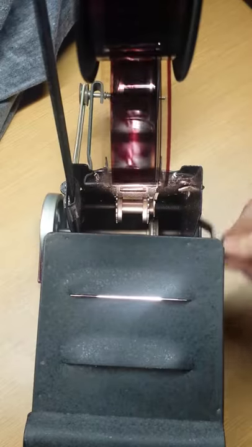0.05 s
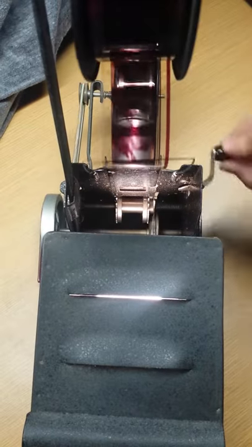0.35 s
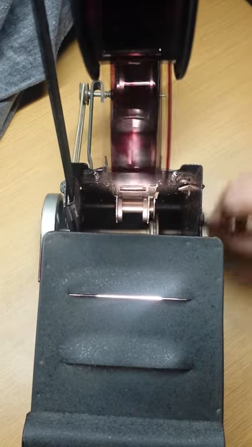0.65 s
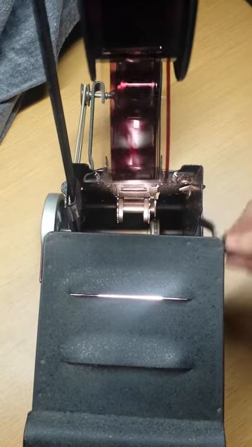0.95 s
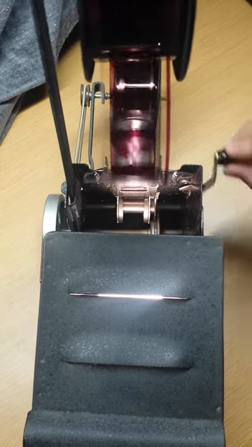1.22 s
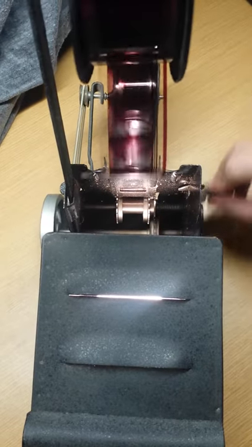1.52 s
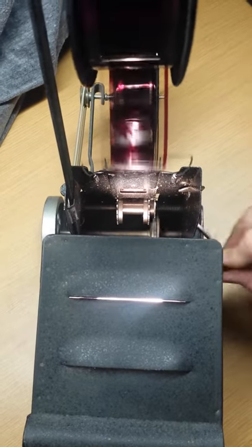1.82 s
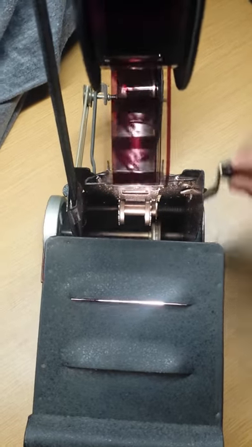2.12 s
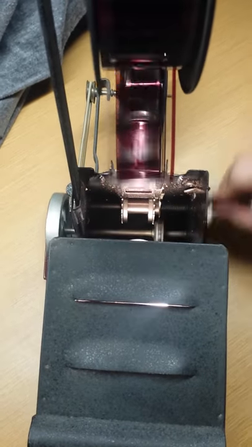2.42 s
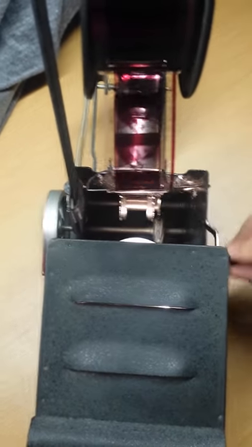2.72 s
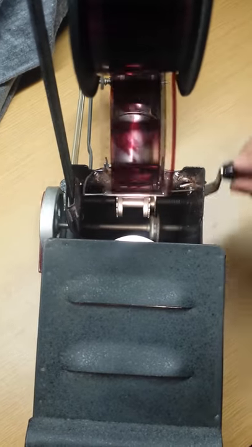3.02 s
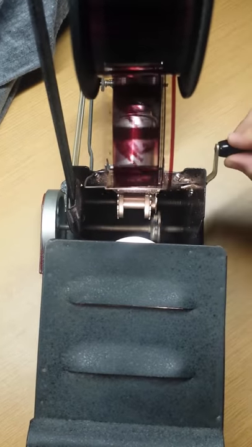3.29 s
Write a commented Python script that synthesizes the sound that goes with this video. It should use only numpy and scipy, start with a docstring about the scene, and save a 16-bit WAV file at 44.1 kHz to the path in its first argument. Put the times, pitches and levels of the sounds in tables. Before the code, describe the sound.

Rapid, steady metallic clacking of a hand-turned film projector, with softly whirring gears underneath.

```python
"""A soft whirr of gears and sliding film rises as a hand-cranked projector spins up on a table, heard
from close above. At about six frames a second the pull-down strikes with a chattering clack and clacks
again as it lets go; the film ticks and scrapes in between. The blows ring the steel parts and the case,
two hard pulls jolt the table, and dry bearings give tiny squeaks. At the end the crank comes to rest."""
import sys
import numpy as np
from scipy import signal
from scipy.fft import rfft, irfft, next_fast_len
from scipy.io import wavfile
from scipy.ndimage import uniform_filter1d, map_coordinates

SR = 44100
rng = np.random.default_rng(int(sys.argv[2]) if len(sys.argv) > 2 else 0)


def wav_out(sig):
    """Save sig, one row per channel (or a flat mono array), as 16-bit PCM at SR to the path in sys.argv[1]."""
    wavfile.write(sys.argv[1], SR, np.round(np.clip(np.atleast_2d(sig).T, -1, 1) * 32767).astype(np.int16))


N = 156555

# Table levels are relative, ahead of the layer gains.
# film sliding through the gate (time [s], level [dB])
FILM_LEVELS = [(0.45, -37), (1.0, -43), (2.1, -40), (2.4, -38), (3.3, -40.5)]
# film hiss (frequency [Hz], level [dB])
FILM_SPECTRUM = [(710, -43), (1200, -37), (1500, -13), (2140, -14.5), (3350, -10), (6170, -6.5),
                 (9270, -12), (15000, -35)]
# gear noise (frequency [Hz], level [dB])
GEAR_SPECTRUM = [(25, -27), (54, -7.5), (119, -1.5), (162, 1), (225, 3.5), (283, -4), (350, -3), (393, -5),
                 (505, 3.5), (612, -8.5), (1050, -1), (1490, -7.5), (2100, -6.5), (2500, -14), (3250, -32),
                 (5500, -120)]
# case hum, louder as the crank works harder (time [s], level [dB])
HUM_LEVELS = [(0.7, -70), (1.3, -48.5), (2.1, -57), (2.9, -43), (3.35, -61.5)]
# case modes stirred by the gears (frequency [Hz], width [Hz], gain [dB])
HUM_MODES = [(119,10,13), (212,16,2), (343,12,5), (1070,45,1)]
# film ticks in the sprockets (time [s], treble [dB], body [dB], snap [dB])
FILM_TICKS = [(0.125, -33.5, -52, -54), (0.827, -26.5, -52, -31.5), (0.994, -24, -47, -64),
              (1.01, -29.5, -46, -61), (1.0934, -14, -36.5, -36.5), (1.178, -24, -49, -34.5),
              (1.2466, -34, -47, -43), (1.5995, -17.5, -39, -30.5), (1.653, -32, -46, -35.5),
              (1.779, -46, -65, -45), (1.9654, -25, -67, -35), (2.4008, -22, -41, -31),
              (2.7094, -19, -40, -32.5), (2.8717, -22, -45, -31.5), (3.062, -27, -46, -56),
              (3.113, -31, -44.5, -37.5), (3.417, -36.5, -58.5, -53.5)]
# pull-down blows (time [s], treble [dB], body [dB], snap [dB], pan [dB], chatter [s], rise [s])
PULL_DOWNS = [(0.206, -9.5, -37, -25, 15, 0.0088, 0.0062), (0.401, -7.5, -29, -25.5, 13.5, 0.008, 0.0038),
              (0.58, -17.5, -33.5, -31, 17.5, 0.0097, 0.0019), (0.737, -13.5, -35, -27, 17, 0.011, 0.0053),
              (0.9175, -16, -38, -30.5, 13.5, 0.01, 0.0035), (1.1, -11.5, -33, -26.5, 14.5, 0.01, 0.0019),
              (1.3009, -6, -32.5, -16.5, 13.5, 0.01, 0.0011), (1.524, -18.5, -33.5, -27, 13, 0.023, 0.0013),
              (1.6967, -14, -37, -32, 14.5, 0.0046, 0.0013),
              (1.8746, -14, -35.5, -29.5, 16, 0.0068, 0.0032), (2.0598, -12, -35, -27, 17, 0.0088, 0.0028),
              (2.2407, -10.5, -30, -21, 16.5, 0.01, 0.0057), (2.4154, -15, -30.5, -25, 17, 0.017, 0.0018),
              (2.569, -11, -32.5, -33, 15, 0.0059, 0.00202), (2.735, -11, -30, -21, 15, 0.012, 0.0014),
              (2.9124, -11.5, -30.5, -30, 13, 0.011, 0.005), (3.204, -23, -41.5, -36, 12, 0.024, 0.0024),
              (3.3703, -23, -40.5, -52, 14, 0.0059, 0.002)]
# the mechanism lets go (time [s], treble [dB], body [dB], snap [dB])
REBOUNDS = [(0.2528, -18.5, -37.5, -34.5), (0.432, -14, -27.5, -27.5), (0.446, -24.5, -50, -29),
            (0.599, -31, -44, -34), (0.6145, -23, -40.5, -33), (0.6363, -25.5, -47, -34.5),
            (0.7724, -20, -41, -47), (0.9515, -15.5, -39.5, -35), (1.1398, -14, -34.5, -26),
            (1.3577, -18.5, -35, -34), (1.5592, -14.5, -33.5, -29), (1.7098, -14.5, -39, -37),
            (1.7349, -18.5, -38.5, -37), (1.8884, -22.5, -60, -32), (1.9074, -15.5, -33.5, -26),
            (2.102, -15.5, -33.5, -27.5), (2.272, -12.5, -31, -26), (2.2844, -17.5, -34, -27.5),
            (2.4484, -16, -30.5, -28), (2.5818, -13, -36.5, -27.5), (2.602, -16, -35.5, -47),
            (2.7778, -17.5, -39, -36), (2.965, -9.5, -30.5, -27.5), (2.9984, -20, -52.5, -22),
            (3.238, -16.5, -35, -31)]
# the film drags (time [s], length [s], treble [dB], body [dB], snap [dB])
FILM_SCRAPES = [(0.507,0.19,-45,-47.5,-42), (1.444,0.06,-33.5,-48.5,-56), (2.33,0.14,-39,-42,-64),
                (2.522,0.037,-20.5,-36,-23.5), (3.105,0.1,-36.5,-45,-49.5), (3.278,0.038,-19.5,-40.5,-39.5)]
# contact noise: steel treble, bright snap, case body (frequency [Hz], level [dB])
TREBLE_SPECTRUM = [(1200,-49), (2500,-11.5), (3300,-16), (4000,-7), (5000,-5.5), (6100,3), (7300,-2),
                   (9000,-11.5), (11000,-16), (15500,-33)]
SNAP_SPECTRUM = [(4000,-20), (7000,-5.5), (9000,3), (11000,-7), (12500,-8), (15500,-20)]
BODY_SPECTRUM = [(60,-31), (150,-10.5), (330,-4), (600,-8), (900,3), (1150,2.5), (1450,-2), (2200,2.5),
                 (3200,3.5), (6000,-14)]
# modes of the steel parts, and of case and table (frequency [Hz], width [Hz], gain [dB])
STEEL_MODES = [(4502, 8, -5), (4936, 22, 1), (5515, 8, -7), (5760, 16, -6), (5911, 8, -6), (6510, 5, -7),
               (7665, 20, -1), (8150, 10, -4), (9085, 14, -2)]
CASE_MODES = [(118, 4.9, 14.5), (216.3, 15, 12), (339.2, 11, 15.5), (1059.4, 33, 1), (2113, 41, 3.5)]
# table jolts (time [s], level [dB])
THUMPS = [(0.209, -39), (1.301, -36)]
# jolted table (frequency [Hz], level [dB])
THUMP_SPECTRUM = [(20, -15), (80, 2), (140, -4), (400, -31), (2000, -71)]
# dry bearings (time [s], length [s], start [Hz], end [Hz], level [dB], rasp [share of pitch])
SQUEAKS = [(0.37, 0.027, 5600, 6220, -26.5, .017), (1.331, 0.023, 12100, 12000, -36, .008),
           (1.382, 0.042, 12330, 12770, -34, .006), (1.429, 0.053, 12450, 12800, -40.5, .005),
           (1.434, 0.019, 6420, 6360, -29, .025), (1.45, 0.038, 5740, 6970, -28.5, .03),
           (2.47, 0.09, 12100, 12100, -42, .011), (2.586, .024, 11950, 12200, -25, .018),
           (2.865, 0.011, 7800, 7800, -27.5, .036), (3.012, 0.039, 13900, 14300, -47, .008),
           (3.112, 0.0086, 7200, 7590, -23.5, .03), (3.208, 0.013, 8300, 8000, -17, .03),
           (3.287, 0.056, 6390, 6420, -41, .004)]
# stereo likeness of contact noise (frequency [Hz], left-right correlation [0..1])
CORRELATION = [(120,1), (300,0.88), (1000,0.82), (2500,0), (12000,0)]
# room decay (frequency [Hz], T60 [s])
ROOM_T60 = [(100,0.13), (1000,0.19), (6000,0.094), (15000,0.08)]
# microphone balance (frequency [Hz], left minus right [dB])
BALANCE = [(60, 1), (99, 2), (160, -0.5), (270, 1.5), (450, -0.5), (740, 2), (1220, 2), (2010, 6),
           (3330, 2), (5500, 12.5), (9080, 1), (15000, -6)]

START_S, SPIN_UP_S, STOP_S, COAST_S = 0.072, 0.38, 3.335, 0.11
IDLE_FILM_DB, IDLE_GEARS_DB, GEARS_DB = -19, -7, -49.5
SETTLE_DB_PER_S, SETTLE_MAX_S, GEAR_SETTLE_SHARE = 77, 0.11, 0.61
TEETH_PER_S, TOOTH_S, TEETH_DB = 90, 0.004, 2
RUSTLE_DB, RUSTLES_PER_S, CATCH_DB, CATCHES_PER_S = 3, 70, 3, 220
TICK_S, TICK_RISE_S, REBOUND_S, REBOUND_RISE_S = 0.0041, 0.0014, 0.0071, 0.0023
CRACK_S, CRACK_DB, RATTLE_S, KNOCK_DB = 0.001, -7, 0.02, 26
TREBLE_DB, BODY_DB, SNAP_DB, STEEL_RING_DB = -10.5, -4.5, -2, 1.5
PAN_CENTRE_DB = 13  # a higher pan leans the treble left
CLACK_ROOM_DB, SQUEAK_ROOM_DB, TOP_HZ = -7.5, -11, 16100


def amp(db):
    """Decibels to gain."""
    return 10 ** (np.asarray(db) / 20)


def unit(x):
    """Scale to rms 1."""
    return x / np.sqrt(np.mean(x ** 2) + 1e-20)


def along(points, hz):
    """Interpolate (Hz, value) points on a log axis."""
    point_hz, values = np.transpose(points)
    return np.interp(np.log(hz + 1), np.log(point_hz + 1), values)


def wobble(knots_per_s):
    """Smooth random curve."""
    return map_coordinates(rng.standard_normal(N // 8), [np.arange(N) * knots_per_s / SR], mode="wrap")


def filtered(x, response):
    """Apply the gain response(hz)."""
    size = next_fast_len(N + SR // 2)
    return irfft(rfft(x, size) * response(np.fft.rfftfreq(size, 1 / SR)), size)[..., :N]


def ring(x, modes):
    """Parallel resonators."""
    return filtered(x, lambda hz: sum(
        amp(db) * 1j * hz * width_hz / (mode_hz ** 2 - hz ** 2 + 1j * hz * width_hz)
        for mode_hz, width_hz, db in modes))


def grit(spectrum, spread_db=2.2):
    """Stereo stream of tiny contacts of uneven size, rms 1."""
    def mid_side_gain(hz):
        angle = np.arccos(np.clip(along(CORRELATION, hz), -1, 1)) / 2
        return amp(along(spectrum, hz)) * [np.cos(angle), np.sin(angle)]

    noise = rng.standard_normal((2, N)) * amp(spread_db * wobble(1500))
    mid, side = filtered(noise, mid_side_gain)
    return unit(np.array([mid + side, mid - side]))


def whirr():
    """Film slides unevenly, loose gear teeth rattle and stir the case; all settle between pulls."""
    t = np.arange(N) / SR
    running = np.clip(np.minimum((t - START_S) / SPIN_UP_S, 1 - (t - STOP_S) / COAST_S), 0, 1)
    idle = 1 - running
    since_pull_s = np.min([np.where(t < at_s, np.inf, t - at_s) for at_s, *_ in PULL_DOWNS], axis=0)
    settle_db = SETTLE_DB_PER_S * np.minimum(since_pull_s, SETTLE_MAX_S)
    film_db = np.interp(t, *np.transpose(FILM_LEVELS)) + IDLE_FILM_DB * idle - settle_db
    film_db += RUSTLE_DB * wobble(RUSTLES_PER_S)
    drive_db = IDLE_GEARS_DB * idle - GEAR_SETTLE_SHARE * settle_db
    contacts = (rng.random(N) < TEETH_PER_S / SR) * rng.exponential(size=N) * running
    tooth_power = signal.lfilter([1], [1, -np.exp(-1 / (TOOTH_S * SR))], contacts)
    rattle = np.sqrt(1 + tooth_power * amp(TEETH_DB) ** 2)
    film = unit(grit(FILM_SPECTRUM) * rattle)
    gears = unit(grit(GEAR_SPECTRUM) * rattle)
    hum = amp(np.interp(t, *np.transpose(HUM_LEVELS))) * unit(ring(gears, HUM_MODES))
    fade_in = np.clip((t - START_S) / 0.0062, 0, 1)
    return fade_in * (amp(film_db) * film + amp(drive_db) * (amp(GEARS_DB) * gears + hum))


def blow_envelope(chatter_s, rise_s, release_s, rattle_db):
    """Parts meet with a crack, chatter briefly and leave a weaker rattle."""
    t = np.arange(SR // 4) / SR
    after_s = np.maximum(t - chatter_s, 0)
    crack = amp(CRACK_DB) * np.exp(-abs(t - rise_s) / CRACK_S)
    chatter = np.exp(-after_s / release_s)
    rattle = amp(rattle_db) * np.exp(-after_s / RATTLE_S)
    return np.minimum(t / rise_s, 1) * (crack + chatter + rattle)


def blow_powers():
    """Ticks, pulls and rebounds add in power: stereo treble, body, snap."""
    ticks = [(*row, PAN_CENTRE_DB, TICK_S, TICK_RISE_S) for row in FILM_TICKS]
    rebounds = [(*row, PAN_CENTRE_DB, REBOUND_S, REBOUND_RISE_S) for row in REBOUNDS]
    treble, body, snap = np.zeros((2, N + SR)), np.zeros(N + SR), np.zeros(N + SR)
    for at_s, treble_db, body_db, snap_db, pan_db, *timing_s in [*ticks, *PULL_DOWNS, *rebounds]:
        lean_db = (pan_db - PAN_CENTRE_DB) / 2
        stereo_gain = amp([[treble_db + lean_db], [treble_db - lean_db]])
        span = slice(round(at_s * SR), round(at_s * SR) + SR // 4)
        treble[:, span] += (stereo_gain * blow_envelope(*timing_s, release_s=0.0048, rattle_db=-14)) ** 2
        body[span] += (amp(body_db) * blow_envelope(*timing_s, release_s=0.015, rattle_db=-4.5)) ** 2
        snap[span] += (amp(snap_db) * blow_envelope(*timing_s, release_s=0.0052, rattle_db=-20.5)) ** 2
    return treble[:, :N], body[:N], snap[:N]


def clinking(x, spread_db=3):
    """No two contacts excite the steel alike: gain varies in narrow, brief patches."""
    spectra = signal.stft(x, nperseg=512)[2]
    patches = uniform_filter1d(rng.standard_normal(spectra.shape[1:]), size=4, axis=0)
    patches = unit(uniform_filter1d(patches, size=5, axis=1))
    return unit(signal.istft(spectra * amp(spread_db * patches), nperseg=512)[1][:, :N])


def clacks_and_scrapes():
    """Blows and dragging film excite steel and case, which ring on."""
    treble, body, snap = (np.sqrt(blow + scrape) for blow, scrape in zip(blow_powers(), scrape_powers()))
    steel = amp(TREBLE_DB) * treble * clinking(grit(TREBLE_SPECTRUM))
    steel += amp(SNAP_DB) * snap * clinking(grit(SNAP_SPECTRUM))
    case = amp(BODY_DB) * body * grit(BODY_SPECTRUM)
    steel_ring = amp(STEEL_RING_DB) * ring(steel, STEEL_MODES)
    case_ring = ring(case + case_knocks(), CASE_MODES)
    return steel + steel_ring + case + case_ring


def case_knocks():
    """The crack of each pull knocks the hollow case: one impulse."""
    knocks = np.zeros(N)
    for at_s, _, body_db, *_, rise_s in PULL_DOWNS:
        knocks[round((at_s + rise_s) * SR)] = amp(body_db + KNOCK_DB)
    return knocks


def table_thumps(rise_s=0.0027, decay_s=0.006):
    """Hard pulls give the table a dull push."""
    t = np.arange(N) / SR
    push = sum(amp(db) * np.clip((t - at_s) / rise_s, 0, 1) * np.exp(-abs(t - at_s) / decay_s)
               for at_s, db in THUMPS)
    return push * grit(THUMP_SPECTRUM, spread_db=-10)


def bearing_squeaks(waver_share=0.00206, flutter_db=3, octave_db=-28):
    """Dry bearings: short raspy, wavering glides, the lower ones with a weak octave."""
    out = np.zeros((2, N))
    for at_s, length_s, start_hz, end_hz, db, rasp_share in SQUEAKS:
        progress = np.clip((np.arange(N) / SR - at_s) / length_s, 0, 1)
        hz = start_hz + (end_hz - start_hz) * progress
        hz *= 1 + waver_share * wobble(250) + rasp_share * wobble(2700)
        phase = 2 * np.pi * np.cumsum(hz) / SR + np.array([[0], [np.pi / 2]])  # right leads by 90 deg
        octave = amp(octave_db) * (start_hz < SR / 4) * np.sin(2 * phase)
        swell = np.sqrt(np.sin(np.pi * progress).clip(0))
        out += amp(db + flutter_db * wobble(200)) * swell * (np.sin(phase) + octave)
    return out


def scrape_powers():
    """Dragging film swells and catches: power in treble, body, snap."""
    catching = amp(CATCH_DB * wobble(CATCHES_PER_S)) ** 2
    powers = np.zeros((3, N))
    for at_s, length_s, *levels_db in FILM_SCRAPES:
        progress = np.clip((np.arange(N) / SR - at_s) / length_s, 0, 1)
        swell = np.sin(np.pi * progress).clip(0)
        powers += amp(levels_db)[:, None] ** 2 * swell * catching
    return powers


def room(x):
    """Small room; treble dies first."""
    hz, t, spectra = signal.stft(rng.standard_normal((2, SR // 2)), SR, nperseg=256)
    decay = amp(-60 * t / along(ROOM_T60, hz)[:, None])
    tail = signal.istft(spectra * decay, SR, nperseg=256)[1]
    return signal.fftconvolve(x, tail / np.linalg.norm(tail[0]), axes=1)[:, :N]


def scene():
    """The projector in its room, brighter towards the left microphone."""
    clacks, squeaks = clacks_and_scrapes(), bearing_squeaks()
    reverb = room(amp(CLACK_ROOM_DB) * clacks + amp(SQUEAK_ROOM_DB) * squeaks)
    mix = clacks + squeaks + reverb + table_thumps() + whirr()
    return filtered(mix, lambda hz: amp(along(BALANCE, hz) * np.array([[0.5], [-0.5]])))


def record(dry):
    """Clip at full scale, then cut everything above the band limit."""
    return filtered(np.clip(dry, -1, 1), lambda hz: hz < TOP_HZ)


dry = scene()
out = record(dry)
wav_out(out)
```